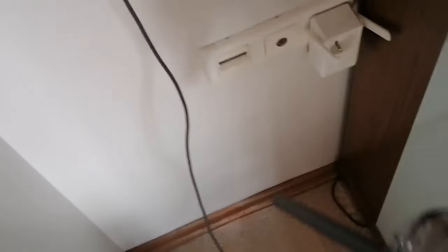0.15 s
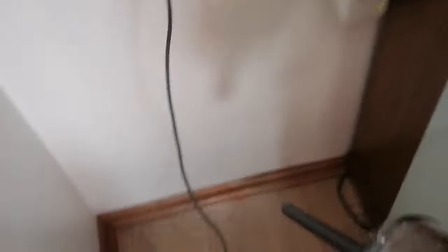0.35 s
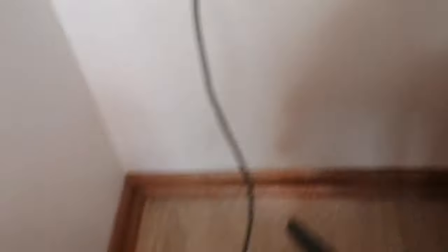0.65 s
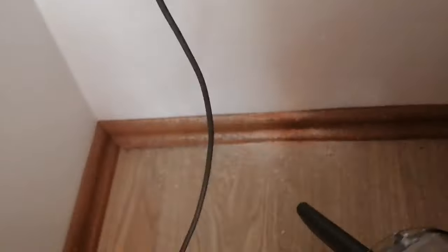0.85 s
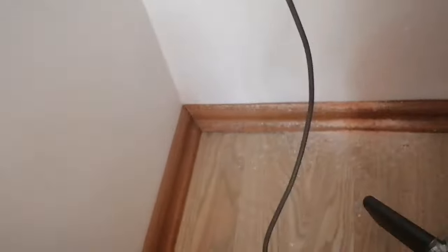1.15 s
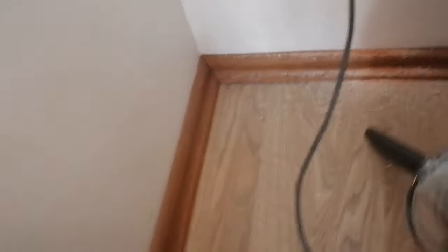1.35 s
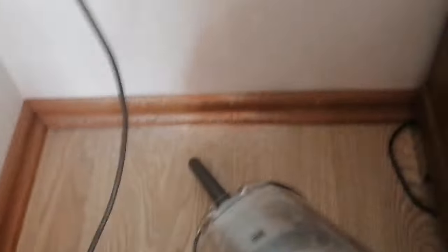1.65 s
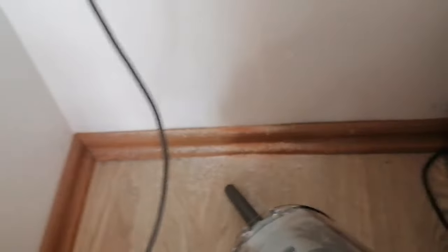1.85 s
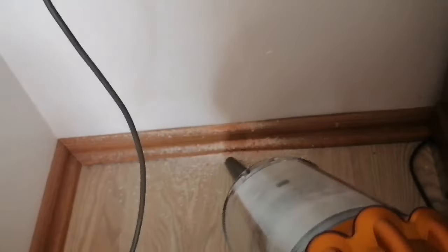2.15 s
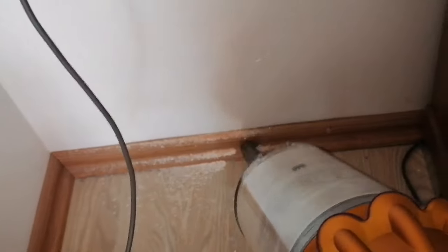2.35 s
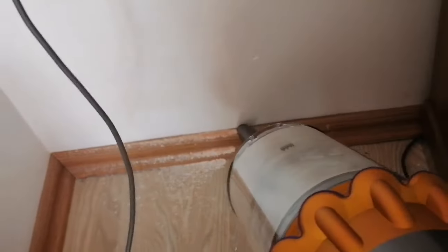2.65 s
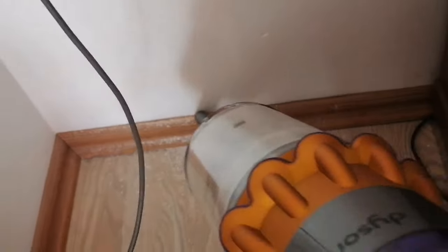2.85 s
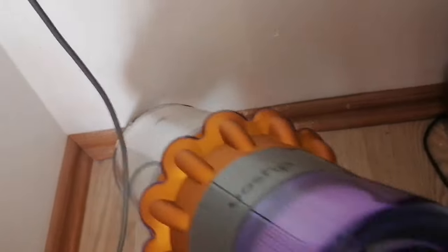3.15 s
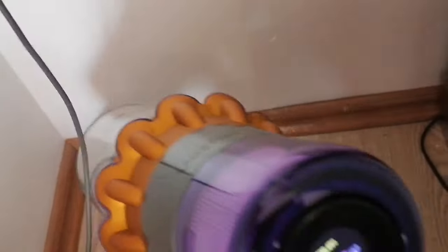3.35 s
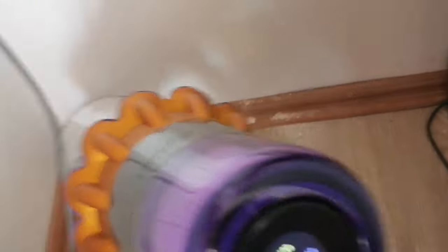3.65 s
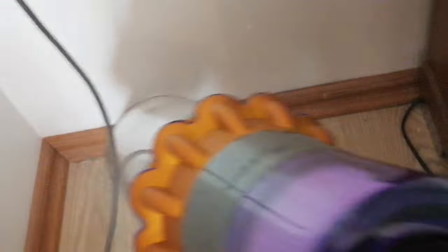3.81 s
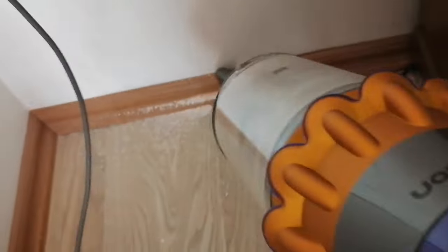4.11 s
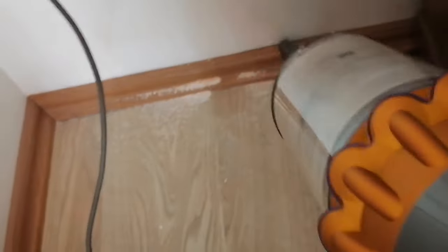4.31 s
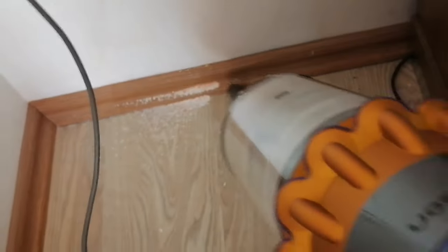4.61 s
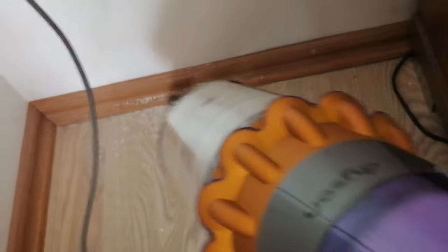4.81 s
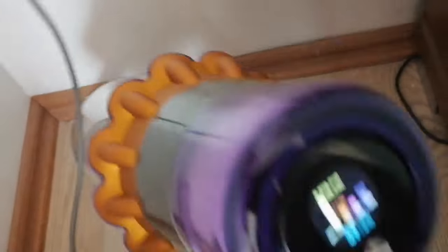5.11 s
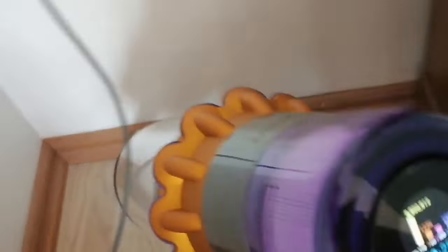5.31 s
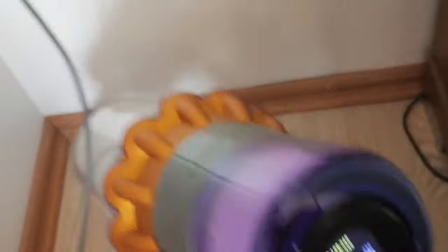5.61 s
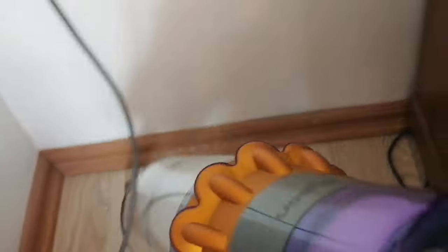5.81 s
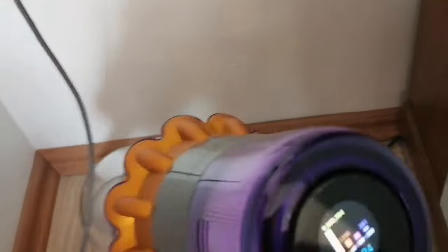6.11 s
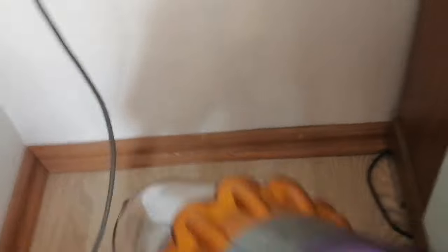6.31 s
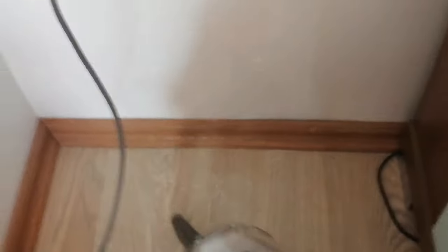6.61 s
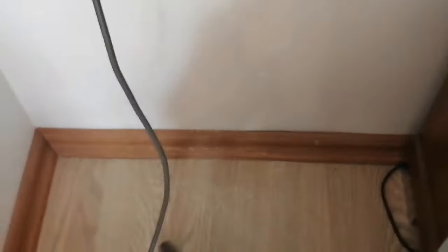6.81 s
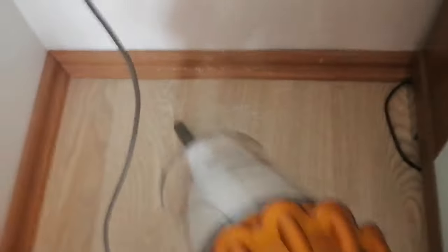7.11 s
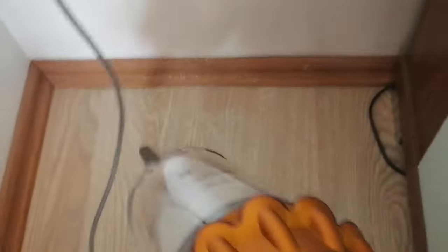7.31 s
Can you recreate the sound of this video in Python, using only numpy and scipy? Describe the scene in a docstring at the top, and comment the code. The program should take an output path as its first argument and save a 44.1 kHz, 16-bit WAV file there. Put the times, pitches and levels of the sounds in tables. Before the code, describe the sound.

A cordless stick vacuum is running close to the microphone in a room with little echo. At about 0.2 seconds its whine drops quickly and the motor stops with a small click. In the lull a sleeve swishes and squeaks faintly, the plastic body thuds at 0.9 seconds, and the hollow nozzle taps wood around 1.6. At 2 seconds the trigger clicks and the motor spins up at once into a steady, hissing rush of air with a thin, fluttering high whine. Exhaust buffets the microphone in low gusts from 2 to 3 seconds and again from 4 to 5. The nozzle knocks on the wooden skirting board at about 4.5 and 5.8 seconds. From 6 seconds a breathy whistle of air at the nozzle glides down, then climbs again near 7, with the vacuum still running at the end, around 7.4 seconds.

```python
"""A rush of air and a thin impeller whine: a cordless stick vacuum, close to a stereo microphone in the
corner of a room with a wooden floor. The motor brakes to a stop; in the lull a sleeve slides and the
plastic body is bumped and gripped. The trigger clicks, the motor spins up, and air rushes through ducts
and vents again, its exhaust buffeting the microphone. The nozzle knocks along the skirting board, and
near the end air whistles through the gap between nozzle and wood."""
import sys
import numpy as np
from scipy import signal
from scipy.fft import rfft, irfft, next_fast_len
from scipy.io import wavfile
from scipy.ndimage import uniform_filter1d, map_coordinates

SR = 44100
rng = np.random.default_rng(int(sys.argv[2]) if len(sys.argv) > 2 else 0)


def to_wav(sig):
    """Store sig (one row per channel, or 1-D mono) as 16-bit WAV at the path in sys.argv[1].

    Samples outside -1..1 are clipped; the rate is SR.
    """
    pcm = np.clip(np.atleast_2d(sig), -1, 1) * 32767
    pcm = np.round(pcm).astype(np.int16)
    wavfile.write(sys.argv[1], SR, pcm.T)  # frames by channels


N = 328986

RELEASE_S, BRAKE_S, BRAKE_POWER = .19, .165, 1.1  # trigger let go; the brake bites harder as it slows
PULL_S, SPIN_UP_S = 2.013, .056  # trigger pulled again
LOWERED_S = 1  # until it is lowered into the corner the machine sounds thinner
RAISED_BIN_DB, RAISED_HOUSING_DB, RAISED_HISS_DB = -2.5, -8, -1.4
BLADES = 9
DIRECT_SHARE, ECHO_SHARE, FLUTTER_HZ = .62, .68, 34  # each motor tone and its fluttering echoes

# air noise of each part, heard close up (frequency [Hz], relative level [dB])
BIN_SPECTRUM = [(60, -23.5), (200, -7.5), (330, -9.5), (400, -8.5), (500, 3), (650, -1), (800, 0.5),
                (1300, -61)]
BIN_BOOM_SPECTRUM = [(320, -38), (390, 3), (432, -0.5), (560, -30.5)]
HOUSING_SPECTRUM = [(400, -24), (620, -4.5), (780, -1.5), (1080, 3.5), (1210, -1.5), (1310, -6),
                    (2000, -39)]
DUCT_SPECTRUM = [(800, -32), (1250, -11), (1480, -2), (1850, -2), (2080, 0.5), (2300, -1), (2800, -12),
                 (4500, -34)]
NOZZLE_SPECTRUM = [(1400, -30), (2200, -16), (2480, -1), (2760, -1.5), (3120, 1.5), (3380, -1), (3650, -8),
                   (4300, -12), (7000, -62)]
LEFT_VENT_SPECTRUM = [(2000, -46), (3700, -17), (4500, -5.5), (5270, -2), (6200, -5.5), (7100, -3),
                      (7700, -4.5), (8500, 3), (9400, 0.5), (10300, -1), (11000, -5), (12500, -8),
                      (14200, -8.5), (15000, -4), (15700, -13)]
RIGHT_VENT_SPECTRUM = [(2000, -32), (3700, -7), (4400, -2.5), (5300, 2), (6200, -0.5), (7250, 3.5),
                       (8300, -4), (9500, -1), (10400, -8), (11000, -6.5), (12500, -7), (14200, -6),
                       (15000, -6), (15700, -23)]
# how each part swells and fades at the microphone (time [s], relative level [dB])
BIN_LEVEL = [(2.1, -52), (2.65, -54), (3.0, -51), (3.45, -48.5), (4.35, -55), (4.9, -52.5), (5.45, -49.5),
             (5.7, -50.5), (6.4, -54), (7.2, -53.5), (7.42, -50)]
HOUSING_LEVEL = [(2.1, -45), (2.5, -44.5), (3.2, -48.5), (3.8, -47.5), (4.65, -43.5), (5.0, -48.5),
                 (5.4, -50.5), (5.65, -47), (6.0, -51), (6.45, -49), (7.1, -53), (7.42, -49)]
DUCT_LEVEL = [(2.1, -48.5), (2.35, -44), (2.6, -46), (4.4, -48), (4.68, -46), (4.9, -48.5), (5.6, -48.0),
              (6.3, -50.5), (6.9, -45), (7.15, -48), (7.4, -46)]
VENT_LEVEL = [(2.3, -32.5), (3.6, -33.5), (4.3, -33), (5.0, -33), (6.2, -32.5), (7.0, -31.0)]
# the machine turns and shades the microphone's right port from the vents (time [s], shading [dB])
TURN = [(2.1, 1), (2.55, 2.5), (2.8, 4), (3.9, 5.5), (4.25, 3.5), (4.7, 5.5), (5.3, 5.5), (6.35, 5),
        (6.95, 2.4), (7.4, 2)]
# likeness of the noise at the left and right ports (frequency [Hz], correlation [0-1])
PORT_LIKENESS = [(60, 0.78), (200, 0.79), (500, 0.95), (850, 0.17), (1500, 0.02)]
# blade tone at full speed, creeping up as the motor settles (time [s], pitch [Hz])
BLADE_PITCH = [(.2, 10510), (2.07, 9820), (2.2, 10125), (2.9, 10420), (3.7, 10495), (4.45, 10510),
               (5.2, 10552), (5.8, 10510), (6.35, 10595), (6.75, 10550), (7.46, 10590)]
# how strongly the casing radiates the blade tone (frequency [Hz], gain [dB])
CASING_GAIN = [(100, -75), (500, -47), (1300, -62), (2300, -50.5), (3300, -61), (9700, -55), (10400, -50)]
# beams of whine sweep over the microphone (time [s], half width [s], left gain [dB], right gain [dB])
WHINE_BEAMS = [(.08, .04, 5, 3), (2.27, .06, 10, 9), (2.41, .025, 14, 5), (2.55, .045, 7, 11),
               (2.75, .035, 14, 5), (2.93, .035, 9, 7), (3.23, .04, 14, 5), (3.52, .05, 9, 1),
               (3.77, .07, 14, 0), (4.2, .08, 15, 10), (4.45, .04, 15, 0), (4.6, .04, 9, 2),
               (4.77, .035, 8, 9), (5.25, .08, 13, 0), (5.47, .04, 17, 0), (5.71, .045, 14, 3),
               (6.06, .035, 9, 2), (6.19, .04, 11, 0)]
# exhaust gusts on the microphone (start [s], length [s], relative level [dB], left minus right [dB])
GUSTS = [(.03, 0.094, -60, -10), (2.029, 0.017, -46, 1), (2.263, 0.024, -44, -9), (2.431, 0.02, -50, -31),
         (2.57, 0.018, -48, -22), (2.686, 0.03, -53, -15), (2.778, 0.1, -58.5, -10),
         (4.172, 0.13, -47, -21), (4.37, 0.02, -52, -12), (4.535, .11, -46.5, -12.5), (4.672, 0.13, -52, 6),
         (4.99, 0.045, -52.5, 5)]
# rumble of air striking the ports (frequency [Hz], relative level [dB])
BUFFET_SPECTRUM = [(15, -34), (40, -7), (75, 3.5), (110, -3.5), (170, -8.5), (300, -18.5), (800, -72)]
# room tone (frequency [Hz], relative level [dB])
ROOM_TONE_SPECTRUM = [(25, -6), (107, -7), (180, -14), (450, -22), (1900, -33), (4000, -35), (6500, -30),
                      (15500, -38)]
# the room's reverberation (frequency [Hz], t60 [s])
ROOM_DECAY = [(100, 0.24), (1000, 0.22), (5000, 0.3), (14000, 0.066)]
# snaps of the trigger and plastic joints (time [s], level [dB])
CLICKS = [(0.344, -46), (0.673, -62), (0.89, -46.5), (1.313, -67), (1.888, -55), (1.988, -35), (2.017, -37),
          (2.025, -41)]
# the hand shifts on the grip (start [s], length [s], scuff level [dB], creak level [dB])
RUBS = [(0.343, 0.015, -62.5, -53), (0.635, 0.034, -64, -90), (0.76, .025, -69, -71),
        (1.81, 0.022, -78, -68), (1.92, 0.04, -64, -58), (2.01, 0.03, -56, -50)]
# plastic snapped or scuffed, and plastic creaking (frequency [Hz], relative level [dB])
PLASTIC_SPECTRUM = [(150, -31), (600, 8.5), (1200, 2.5), (2500, 4), (4200, 3), (8500, 7.5), (12000, -3.5),
                    (15500, -5)]
CREAK_SPECTRUM = [(150, -13), (400, -2), (650, 5), (850, -2), (1200, -17), (3000, -12), (6000, -52)]
# low ring as the rotor stops (frequency [Hz], level [dB], t60 [s])
STOP_MODES = [(132.7, -50, 0.69)]
# dull bumps of the machine in the hand (time [s], relative level [dB])
BUMPS = [(0.359, -47), (0.893, -26), (2.991, -40), (5.807, -36.5)]
# modes of the bumped body (frequency [Hz], relative level [dB], t60 [s])
BODY_MODES = [(74.5, 1.5, 0.12), (198, -3, 0.115), (333, -9.5, 0.07), (434, -10, 0.06)]
# sleeve squeak, its pitch following the arm's speed (time [s], pitch [Hz], relative level [dB])
SQUEAK = [(.8, 6800, -100), (.86, 7400, -74), (.94, 6800, -80), (1.0, 7850, -72), (1.052, 8050, -59),
          (1.1, 7000, -100), (1.16, 6550, -71), (1.245, 5200, -76), (1.29, 5100, -110)]
# faster strokes of the sleeve (time [s], half width [s], level [dB])
SWISHES = [(.5, 0.18, -69.5), (1.46, 0.056, -72.5), (1.6, 0.078, -68.5)]
# smooth cloth sliding (frequency [Hz], relative level [dB])
CLOTH_SPECTRUM = [(3000, -14.5), (5300, -13), (7100, -2), (9300, -5), (10900, 3), (12200, -10),
                  (15000, -25)]
# the nozzle meets wood (time [s], relative ring level [dB], pitch [Hz], clack level [dB])
KNOCKS = [(0.8897, -45, 600, -42), (1.5709, -17.5, 570, -45.5), (1.5765, -26, 590, -58),
          (1.583, -35, 702, -49), (1.628, -40, 590, -57), (4.5415, -19.5, 700, -41), (4.548, -24, 700, -46),
          (4.576, -26, 740, -46), (5.8068, -13, 700, -35)]
# modes of the hollow nozzle (multiple of the pitch [ratio], relative level [dB], t60 [s])
NOZZLE_MODES = [(.36, -24.5, 0.057), (.75, -16.5, 0.029), (1, 3.5, 0.011), (1.3, -18, 0.0081),
                (2.75, -21.5, 0.02)]
# clack of the nozzle's shell (frequency [Hz], relative level [dB])
CLACK_SPECTRUM = [(200, -4), (600, -3), (1200, -7), (1700, -3), (2400, -13), (3150, -12), (4000, -31),
                  (15000, -40)]
# the gap between nozzle and wood whistles as it opens and closes (time [s], pitch [Hz], level [dB])
GAP_WHISTLE = [(5.97, 3500, -66), (6.05, 3350, -46), (6.32, 3113, -74.5), (6.39, 3000, -44),
               (6.5, 2830, -49), (6.7, 2420, -45.5), (6.79, 2100, -57), (6.87, 1770, -43.5),
               (6.94, 2680, -42), (7.1, 2980, -39), (7.25, 3090, -38.5)]


def amp(db):
    """Decibels to gain."""
    return 10 ** (np.asarray(db) / 20)


def unit(x):
    """Scale to rms 1."""
    return x / np.sqrt(np.mean(x ** 2) + 1e-20)


def along(points, hz):
    """Read (frequency [Hz], value) points on a log axis."""
    knots_hz, values = np.transpose(points)
    return np.interp(np.log(hz + 1), np.log(knots_hz + 1), values)


def curves(table):
    """One value per sample for each column after the time."""
    times, *columns = np.transpose(table)
    return [np.interp(np.arange(N) / SR, times, column) for column in columns]


def wobble(rate):
    """A smooth random curve, rate knots a second."""
    return map_coordinates(rng.standard_normal(int(N * rate / SR) + 4), [np.arange(N) * rate / SR])


def narrow_noise(width_hz):
    """Complex stereo flutter of rms 1: it spreads a tone into a band about width_hz wide."""
    real, imaginary = unit(np.array([[wobble(width_hz), wobble(width_hz)] for _ in range(2)]))
    return (real + 1j * imaginary) / np.sqrt(2)


def filtered(x, response):
    """x times a response of frequency."""
    size = next_fast_len(N + SR // 2)
    return irfft(rfft(x, size) * response(np.fft.rfftfreq(size, 1 / SR)), size)[..., :N]


def resonance(x, centre_hz, width_hz):
    """x through one resonance, with gain 1 at its centre."""
    return filtered(x, lambda hz: 1j * hz * width_hz / (centre_hz ** 2 - hz ** 2 + 1j * hz * width_hz))


def noise(spectrum):
    """Noise of rms 1 at the microphone's two ports, alike in the bass and unrelated in the treble."""
    def mid_side_gains(hz):
        spread = np.arccos(np.clip(along(PORT_LIKENESS, hz), -1, 1)) / 2
        return amp(along(spectrum, hz)) * [np.cos(spread), np.sin(spread)]

    mid, side = filtered(rng.standard_normal((2, N)), mid_side_gains)
    return unit(np.array([mid + side, mid - side]))


def panned(db):
    """Constant-power gains with the left db above the right."""
    gains = amp(np.array([db, -db]).reshape(2, -1) / 2)
    return gains / np.sqrt(np.mean(gains ** 2, axis=0))


def fade(t, t60):
    """Exponential decay, 60 dB down at t60."""
    return np.exp(-np.log(1000) * t / t60)


def swell(s, half_width):
    """A rounded swell that peaks at time s."""
    return np.exp(-.5 * ((np.arange(N) / SR - s) / half_width) ** 2)


def held(start, length, rise, t60):
    """An envelope that rises up to its start, holds and dies away."""
    t = np.arange(N) / SR - start
    return np.clip(1 + t / rise, 0, 1) * fade(np.maximum(t - length, 0), t60)


def ring(modes, attack_s):
    """One blow on modes (frequency [Hz], level [dB], t60 [s])."""
    t = np.arange(SR // 2) / SR
    ringing = sum(amp(db) * fade(t, t60) * np.sin(2 * np.pi * hz * t) for hz, db, t60 in modes)
    return ringing * (1 - np.exp(-t / attack_s))


def add(track, s, sound):
    """Mix a sound into a track at time s."""
    part = track[..., round(s * SR):][..., :sound.shape[-1]]
    part += sound[..., :part.shape[-1]]


def wall_echo(x, delay_s, sway, share):
    """A wall near the microphone combs the sound; the comb slides as the machine moves."""
    now = np.arange(N)
    echo = [np.interp(now - SR * delay_s * np.exp(sway * wobble(2)), now, side) for side in x]
    return (x + share * np.array(echo)) / np.hypot(1, share)


def room(x, wet_db):
    """Add the room's short tail, a different one at each port."""
    hz, t, spectra = signal.stft(rng.standard_normal((2, SR // 2)), SR, nperseg=256)
    tail = signal.istft(spectra * fade(t, along(ROOM_DECAY, hz)[:, None]), SR, nperseg=256)[1]
    tail = np.pad(tail / np.linalg.norm(tail[0]), ((0, 0), (SR // 200, 0)))  # arrives 5 ms late
    return x + amp(wet_db) * signal.fftconvolve(x, tail, axes=1)[:, :N]


def motor_speed():
    """Share of full speed: the motor runs, brakes, rests and spins up again."""
    t = np.arange(N) / SR
    braking = 1 - np.clip((t - RELEASE_S) / BRAKE_S, 0, 1) ** BRAKE_POWER
    return braking + np.clip((t - PULL_S) / SPIN_UP_S, 0, 1)


def raised():
    """1 while the machine is held up by the wall, 0 once it is down in the corner."""
    return np.arange(N) / SR < LOWERED_S


def housing_level():
    """Relative level of the motor housing in dB; the nozzle and shaft tone follow it."""
    return curves(HOUSING_LEVEL)[0] + RAISED_HOUSING_DB * raised()


def airflow(speed):
    """Close up, turbulence sounds in the vents, bin, housing, duct and nozzle, growing with speed."""
    turn_db, = curves(TURN)
    gap_db = curves(GAP_WHISTLE)[1]
    gap_flow = amp(gap_db - gap_db.max())
    bin_db = curves(BIN_LEVEL)[0] + RAISED_BIN_DB * raised()
    housing_db = housing_level()
    swell_db = housing_db - np.mean(HOUSING_LEVEL, axis=0)[1]
    vent_db = curves(VENT_LEVEL)[0] + RAISED_HISS_DB * raised() + .25 * wobble(5.9) + .73 * wobble(35)
    duct_db = curves(DUCT_LEVEL)[0] + 3.5 + .78 * wobble(7.8)
    nozzle_db = -42.95 + .35 * swell_db + 5.8 * gap_flow + .12 * wobble(12)
    vents = np.array([noise(LEFT_VENT_SPECTRUM)[0], amp(-turn_db) * noise(RIGHT_VENT_SPECTRUM)[1]])
    air = amp(vent_db) * vents
    air += amp(bin_db + 3) * noise(BIN_SPECTRUM)
    # the bin's lowest mode swells faster than the rest as the body nears the microphone
    boom_db = bin_db + 1.36 * (bin_db - bin_db.max()) + 2
    air += amp(boom_db) * panned(5.3) * noise(BIN_BOOM_SPECTRUM)
    # turning the machine shifts the housing, duct and nozzle sounds from port to port, the nozzle most
    air += amp(housing_db + 1.5) * panned(.41 * turn_db - 4.5) * noise(HOUSING_SPECTRUM)
    air += amp(duct_db) * panned(.37 * turn_db - 3) * noise(DUCT_SPECTRUM)
    air += amp(nozzle_db + 1.2 * wobble(60)) * panned(.59 * turn_db - .9) * noise(NOZZLE_SPECTRUM)
    air = wall_echo(air, delay_s=.0008, sway=.15, share=.19)
    return wall_echo(air * speed ** 1.63, delay_s=.0031, sway=.082, share=.26)


def impeller_whine(speed):
    """Blade tone, the order below it and shaft tone: clean at full speed, breathy as the blades stall."""
    blade_hz = speed * curves(BLADE_PITCH)[0]
    beams = np.sqrt(sum((amp([[left_db], [right_db]]) - 1) ** 2 * swell(s, width) ** 2
                        for s, width, left_db, right_db in WHINE_BEAMS))
    shaft_angle = 2 * np.pi * np.cumsum(blade_hz / BLADES * (1 + .00029 * wobble(60))) / SR
    stall = np.clip(6 * (1 - speed), 0, 1)

    def tone(order, beam=0):
        """The direct tone beats with its echoes, differently at each port, as the machine moves."""
        clean = DIRECT_SHARE + beam * amp(1.2 * wobble(20)) + ECHO_SHARE * narrow_noise(FLUTTER_HZ)
        flutter = np.sqrt(1 - stall) * clean + np.sqrt(stall) * narrow_noise(1000)
        return np.sqrt(2) * np.real(flutter * np.exp(1j * order * shaft_angle))

    blades = amp(along(CASING_GAIN, blade_hz)) * tone(order=BLADES, beam=beams)
    blades += amp(-50) * speed * panned(10) * tone(order=BLADES - 1)
    # a duct resonance squawks when the blade tone sweeps through it
    squawk = amp(20.5) * resonance(blades, centre_hz=2350, width_hz=80)
    # the shaft tone grows as it climbs into a ring of the housing
    shaft = amp(housing_level() - 5.5) * speed ** 2 * tone(order=1)
    return blades + squawk + resonance(shaft, centre_hz=1165, width_hz=90)


def exhaust_buffet(speed):
    """The exhaust blows straight on the microphone: a light draught and lumpy gusts."""
    gusts = sum(amp(db) * panned(pan_db) * held(s, length, rise=.013, t60=.12)
                for s, length, db, pan_db in GUSTS)
    draught = amp(-75 + 4.1 * wobble(5.4)) * speed
    return (draught + gusts) * amp(1.5 * wobble(25)) * noise(BUFFET_SPECTRUM)


def room_tone(hum_hz=102.5):
    """Faint noise and a low hum in the room behind the machine."""
    hum = np.sqrt(2) * amp(-71 + wobble(7.8)) * np.sin(2 * np.pi * hum_hz * np.arange(N) / SR)
    return hum + amp(-69.5) * noise(ROOM_TONE_SPECTRUM)


def handling():
    """Plastic parts snap in short bursts; the hand scuffs and creaks on the grip."""
    t = np.arange(SR // 4) / SR
    snaps, scuffs, creaks = np.zeros((3, N))
    for s, db in CLICKS:
        add(snaps, s, amp(db) * (fade(t, .025) + amp(-11.5) * fade(t, .095)))
    for s, length, scuff_db, creak_db in RUBS:
        stroke = held(s, length, rise=.04, t60=.25)
        scuffs += amp(scuff_db) * stroke
        creaks += amp(creak_db) * stroke
    plastic = (snaps * panned(-2.5) + scuffs * amp(3.9 * wobble(83))) * noise(PLASTIC_SPECTRUM)
    return plastic + creaks * amp(2.6 * wobble(70)) * noise(CREAK_SPECTRUM)


def rotor_jolt():
    """The jolt of the stopping rotor leaves a low ring."""
    track = np.zeros(N)
    add(track, RELEASE_S + BRAKE_S, ring(STOP_MODES, attack_s=.014))
    return track


def body_bumps():
    """The whole machine thuds against the hand, just right of centre."""
    track = np.zeros(N)
    for s, db in BUMPS:
        add(track, s, amp(db) * ring(BODY_MODES, attack_s=.0074))
    return track * panned(-1.4)


def sleeve():
    """Sliding cloth: soft swishes, and a thin squeak with a weaker partial a fifth above."""
    hz, db = curves(SQUEAK)
    angle = 2 * np.pi * np.cumsum(hz * (1 + .008 * wobble(55))) / SR
    partials = np.exp(1j * angle) + amp(-16) * narrow_noise(300) * np.exp(1.5j * angle)
    squeak = amp(db + 3.5 * wobble(60)) * np.real(.7 * narrow_noise(330) * partials)
    strokes = sum(amp(level_db) * swell(s, width) for s, width, level_db in SWISHES)
    return squeak + strokes * amp(1.5 * wobble(30) + 2 * wobble(170)) * noise(CLOTH_SPECTRUM)


def nozzle_knocks():
    """The hollow nozzle taps wood: a few low modes and a short, dense clack of the plastic shell."""
    t = np.arange(SR // 4) / SR
    ringing, clacks = np.zeros((2, N))
    for s, ring_db, pitch_hz, clack_db in KNOCKS:
        modes = [(pitch_hz * ratio, db, t60) for ratio, db, t60 in NOZZLE_MODES]
        add(ringing, s, amp(ring_db) * ring(modes, attack_s=.0016))
        add(clacks, s, amp(clack_db) * fade(t, .048) * (1 - fade(t, .0039)))
    shell = filtered(rng.standard_normal((2, N)), lambda hz: amp(along(CLACK_SPECTRUM, hz)))
    return (ringing + clacks * unit(shell)) * panned(.81)


def gap_whistle():
    """Air squeezed through the nozzle gap rings in one gliding band: a whistle in a breathy skirt."""
    hz, db = curves(GAP_WHISTLE)
    band = narrow_noise(200) + .8 * narrow_noise(1000)
    whistle = np.real(band * np.exp(2j * np.pi * np.cumsum(hz) / SR))
    return amp(db) * panned(curves(TURN)[0] - 4.5) * whistle


def scene():
    """The machine and its handling close to the microphone, with a little of the room behind."""
    speed = motor_speed()
    machine = room(airflow(speed) + speed * gap_whistle(), wet_db=-14.5) + impeller_whine(speed)
    contacts = room(nozzle_knocks() + body_bumps() + handling(), wet_db=-14)
    return machine + contacts + sleeve() + rotor_jolt() + exhaust_buffet(speed) + room_tone()


def record(dry):
    """The recorder keeps nothing above 15.8 kHz."""
    return filtered(dry, lambda hz: hz < 15800)


dry = scene()
out = record(dry)
to_wav(out)
```